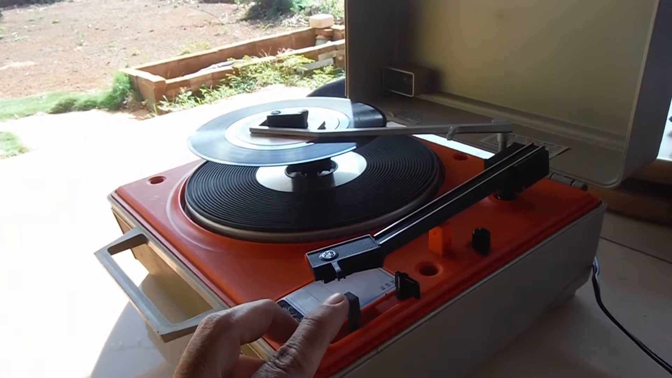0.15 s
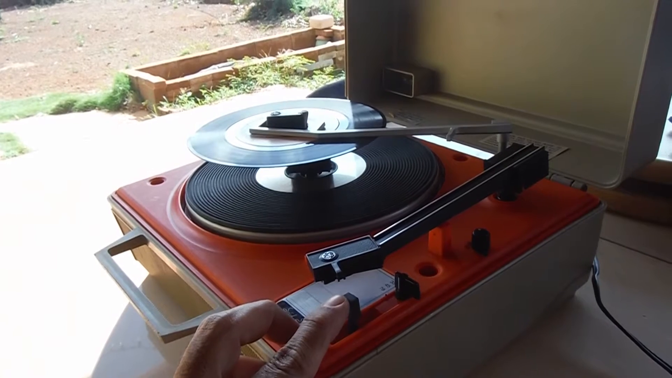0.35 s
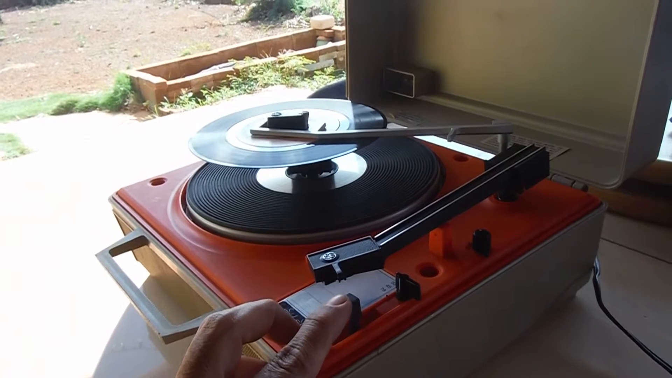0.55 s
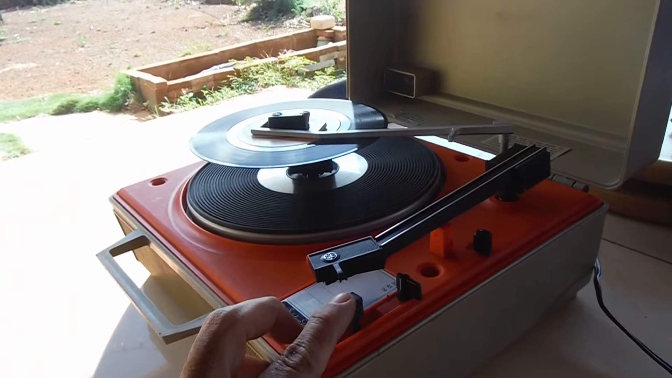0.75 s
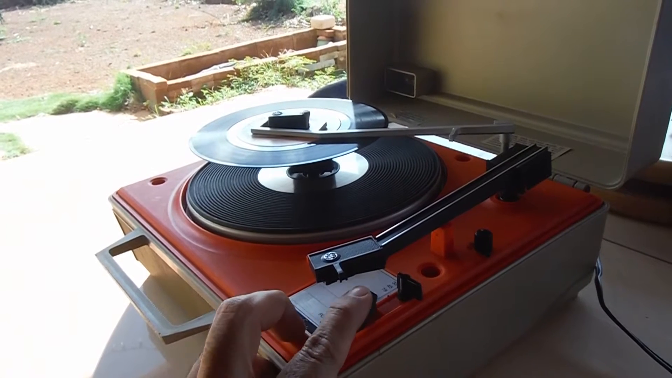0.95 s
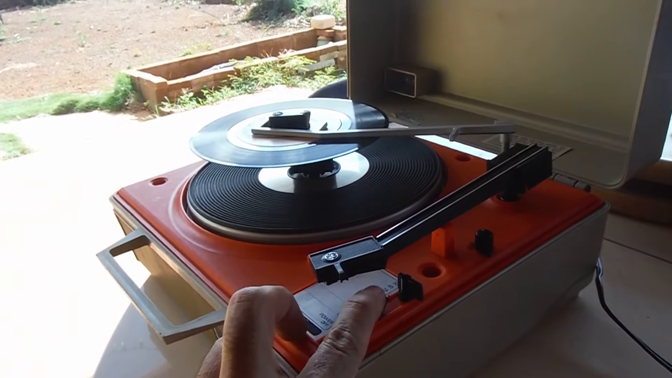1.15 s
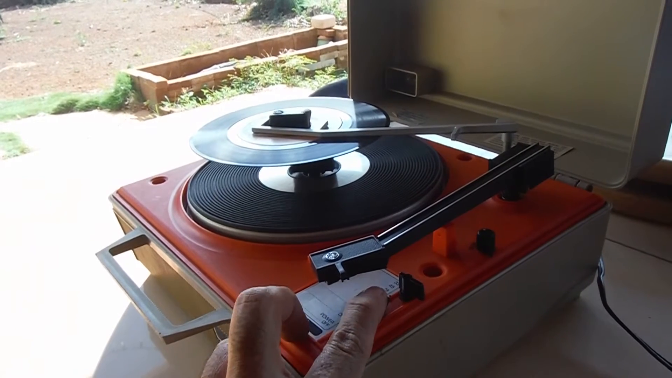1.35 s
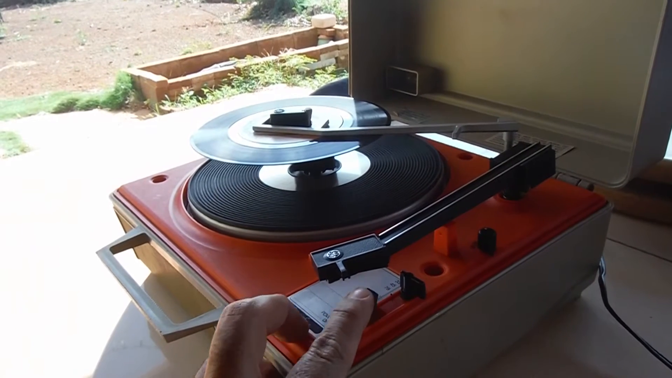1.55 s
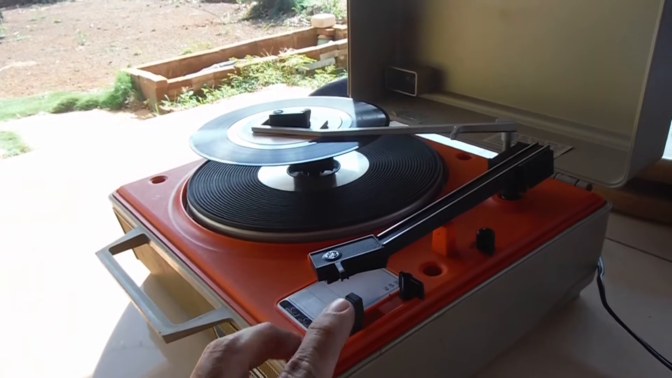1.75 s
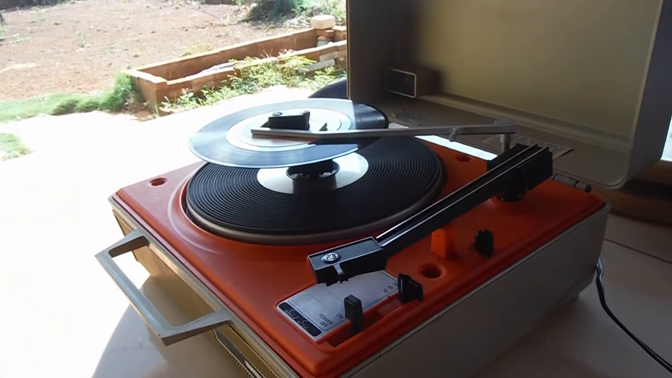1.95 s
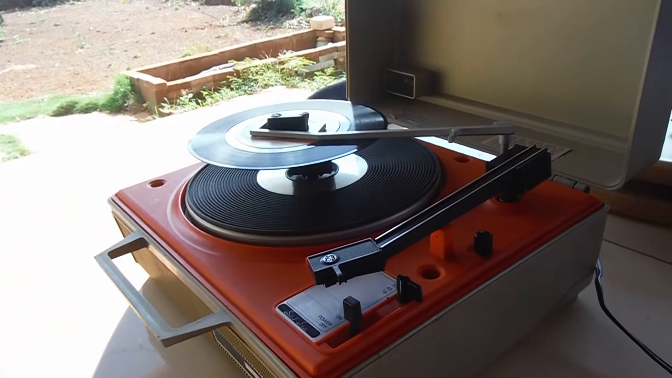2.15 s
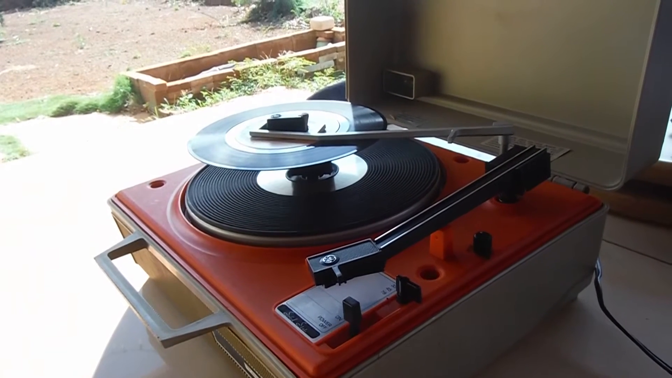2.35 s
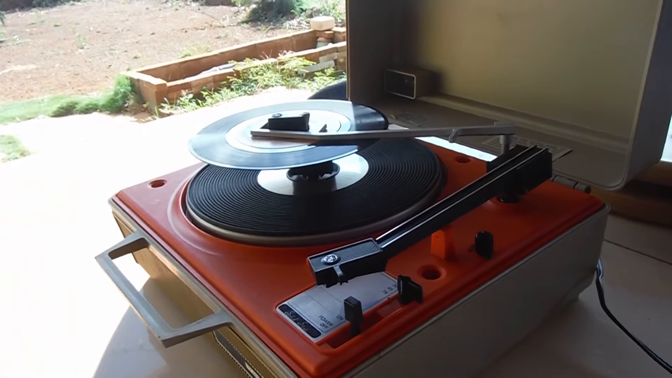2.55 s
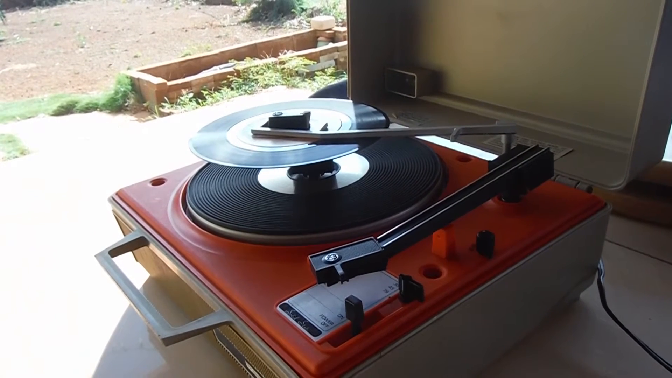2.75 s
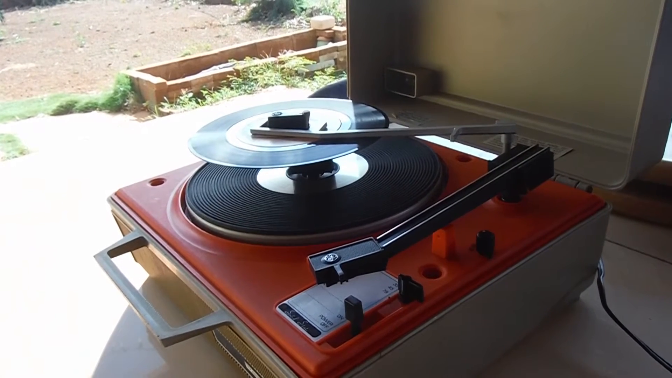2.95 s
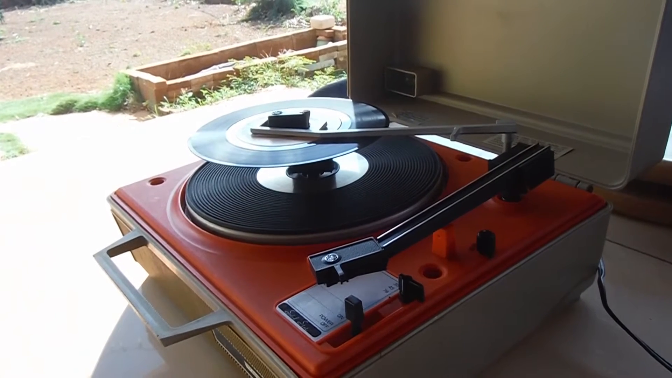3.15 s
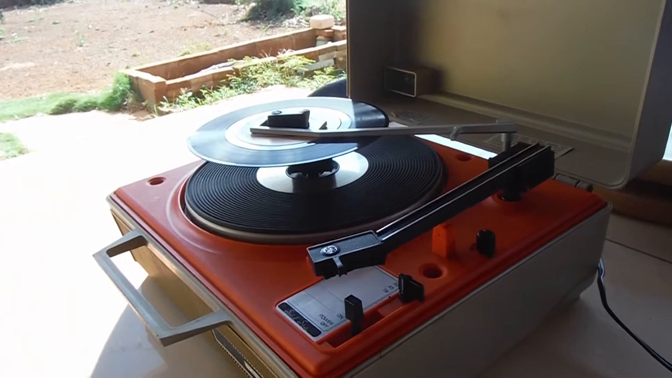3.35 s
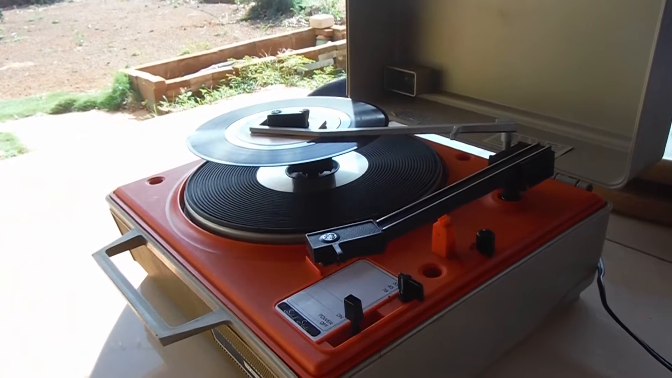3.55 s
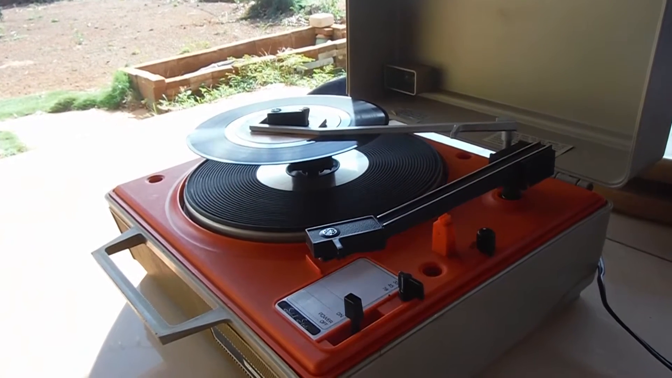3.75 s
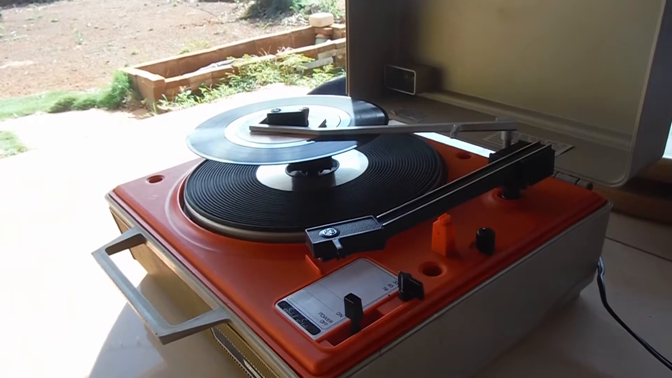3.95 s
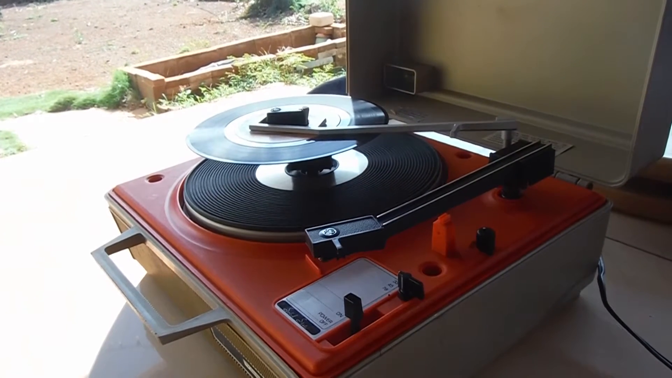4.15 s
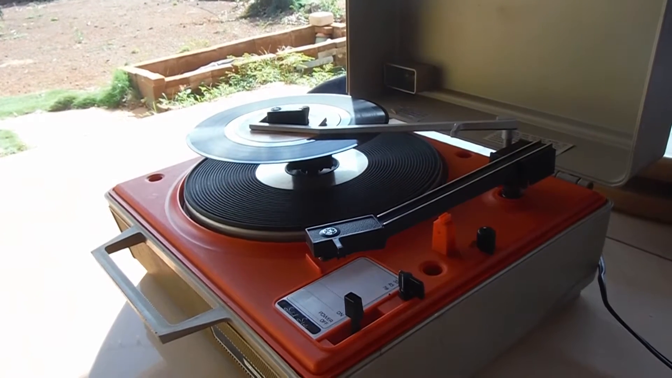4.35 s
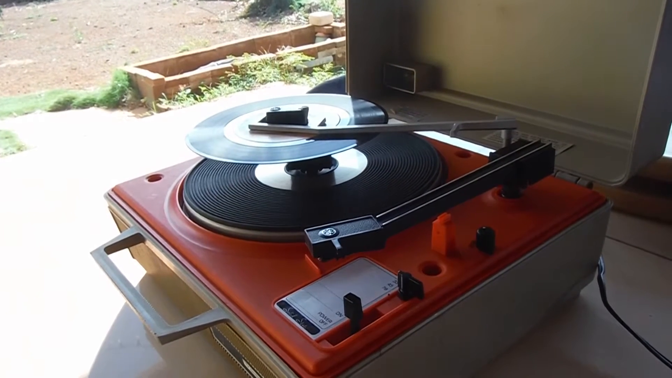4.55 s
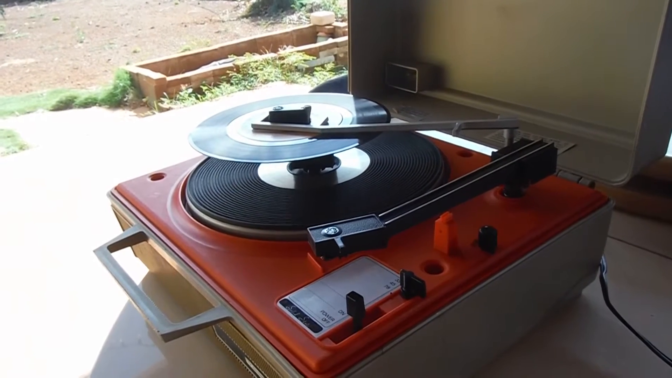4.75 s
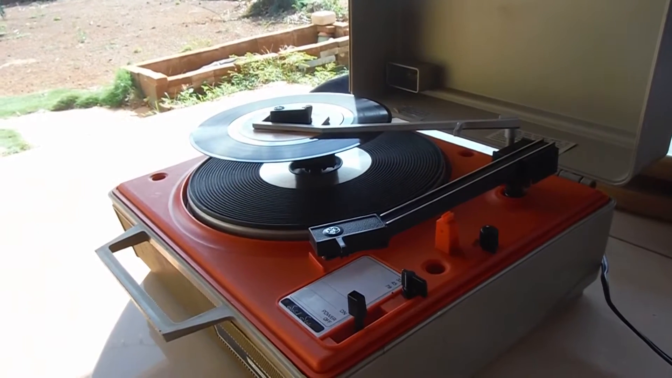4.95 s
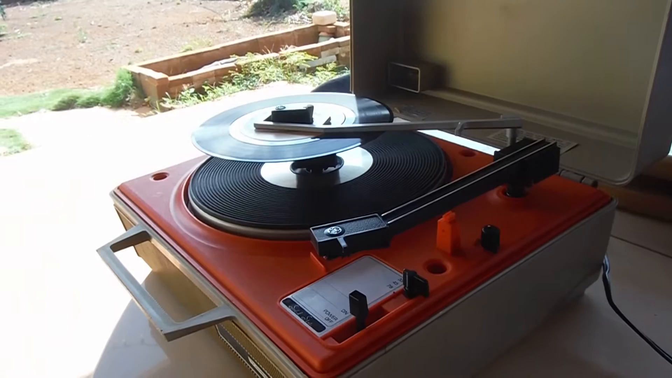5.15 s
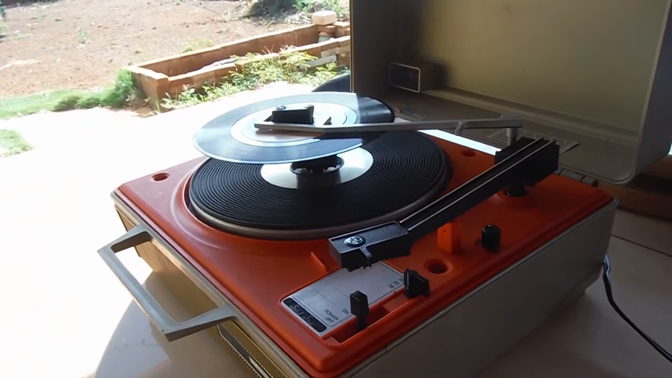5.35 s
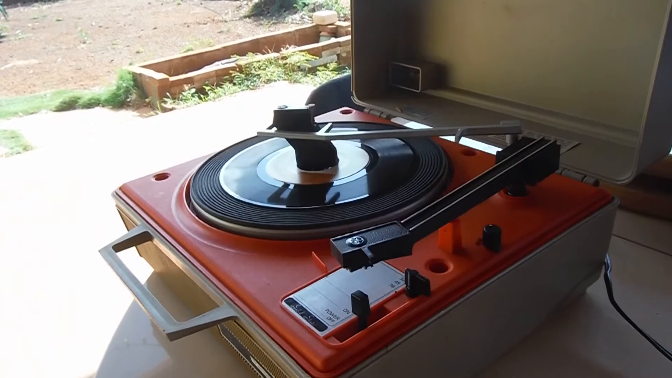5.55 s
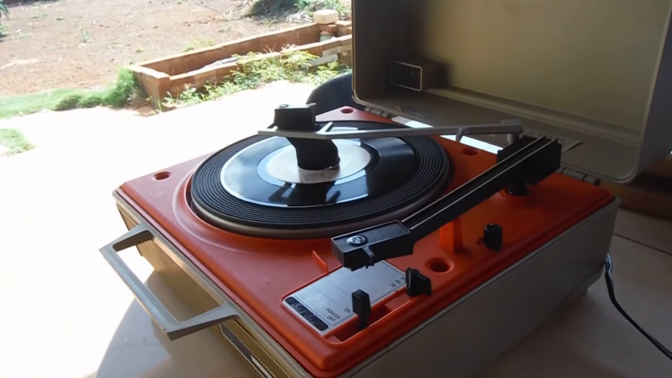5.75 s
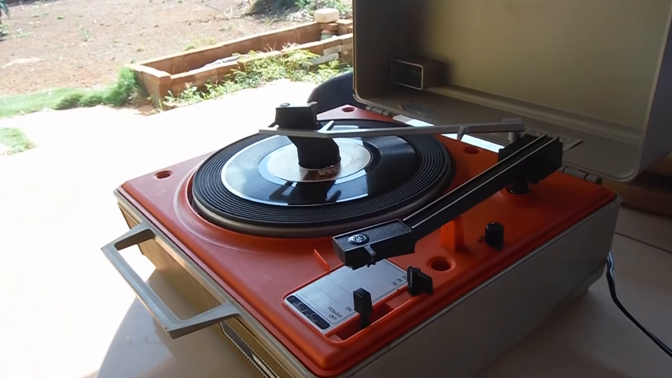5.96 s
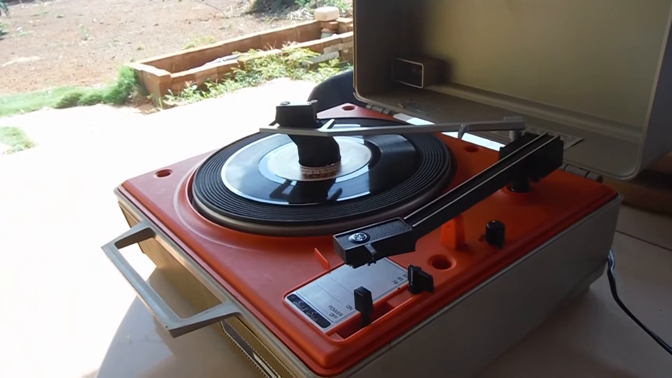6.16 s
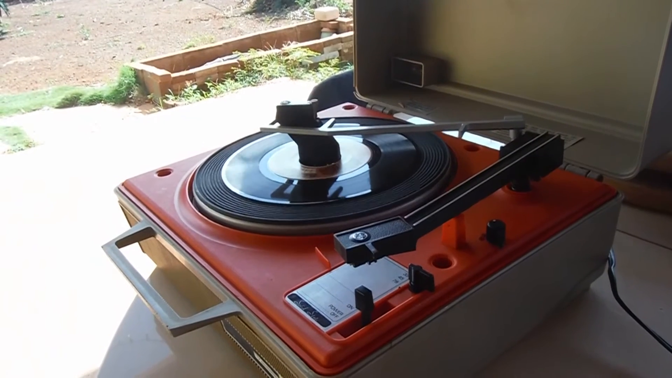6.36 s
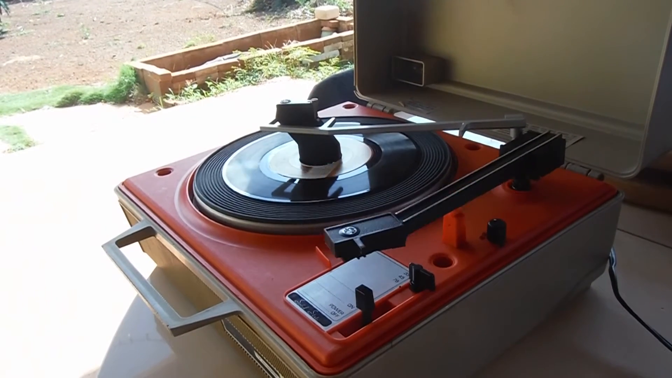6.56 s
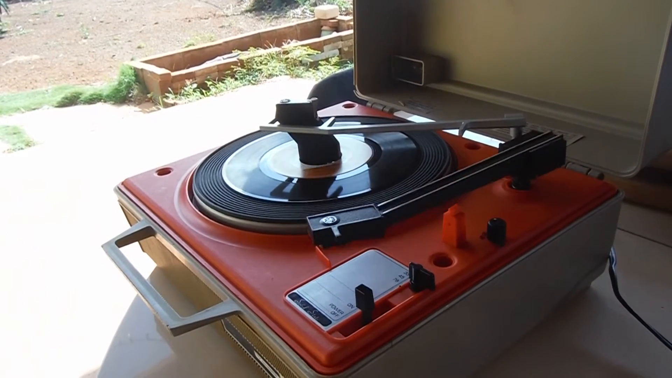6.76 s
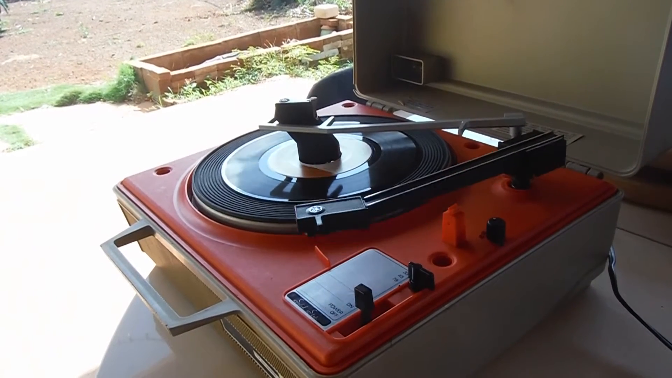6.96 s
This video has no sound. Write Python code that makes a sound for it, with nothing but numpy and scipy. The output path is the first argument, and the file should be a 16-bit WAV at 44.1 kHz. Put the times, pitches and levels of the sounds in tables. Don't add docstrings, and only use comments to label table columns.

```python
import sys
import numpy as np
from scipy import signal
from scipy.fft import rfft, irfft, next_fast_len
from scipy.io import wavfile
from scipy.ndimage import uniform_filter1d, map_coordinates

SR = 44100
rng = np.random.default_rng(int(sys.argv[2]) if len(sys.argv) > 2 else 0)


def volts(x):
    e = np.asarray(x, float) / 20
    return 10 ** e


def store_wav(level_fs):
    pcm = np.round(np.clip(np.atleast_2d(level_fs), -1, 1) * 32767)
    wavfile.write(sys.argv[1], SR, pcm.T.astype(np.int16))


N = 308876

# f/Hz, width/Hz, level/dB
CASE_BODY = [(373.8, 19, -4), (697, 13, -9)]


def unit(x):
    return x / np.sqrt(np.mean(x ** 2) + 1e-20)


def along(points, hz):
    f, v = np.transpose(points)
    return np.interp(np.log(hz + 1), np.log(f + 1), v)


def curves(rows):
    s, *cols = np.transpose(rows)
    return [np.interp(np.arange(N) / SR, s, c) for c in cols]


def wobble(rate):
    at = np.arange(0, N + 16, 16)
    knots = rng.standard_normal(int(N * rate / SR) + 4)
    return np.interp(np.arange(N), at, map_coordinates(knots, [at * rate / SR]))


def filtered(x, response):
    m = next_fast_len(x.shape[-1] + 8192)
    return irfft(rfft(x, m) * response(np.fft.rfftfreq(m, 1 / SR)), m)[..., :x.shape[-1]]


def resonances(body, f):
    return sum(volts(db) * 1j * f * w / (c * c - f * f + 1j * f * w) for c, w, db in body)


def noise(spectrum):
    return unit(filtered(rng.standard_normal(N), lambda hz: volts(along(spectrum, hz))))


def ringing(x, body):
    return filtered(x, lambda f: resonances(body, f) ** 2)


def tone(hz, db, drift_hz, flutter_db):
    phase = 2 * np.pi * np.cumsum(hz + drift_hz * wobble(25)) / SR
    return np.sqrt(2) * volts(db + flutter_db * wobble(7.7)) * np.sin(phase)


def porch(burst, wet_db):
    # f/Hz, t60/s
    porch_t60 = [(300, 0.53), (1000, 0.34), (2500, 0.15), (8000, 0.23), (14000, 0.11)]
    hz, t, z = signal.stft(rng.standard_normal(SR // 3), SR, nperseg=256)
    tail = signal.istft(z * volts(-60 * t / along(porch_t60, hz)[:, None]), SR, nperseg=256)[1]
    tail = tail * (1 - np.exp(-np.arange(len(tail)) / SR / 0.0093))
    tail = tail / np.linalg.norm(tail)
    return volts(wet_db) * signal.fftconvolve(burst[:len(burst) // 3], tail)[:len(burst)]


def even(x):
    z = rfft(x)
    flat = irfft(z / np.sqrt(np.abs(uniform_filter1d(np.abs(z) ** 2, size=60)) + 1e-12), len(x))
    return flat * (np.arange(len(x)) < len(x) // 2)


def contacts(rows, body, knock_db, crack_db, wet_db, steel_hz, low_hz, strike, damping=0.028):
    # low f/Hz, high f/Hz
    ranges = [(200, 1310), (1500, 3780)]
    crack_hz, rise_s, strike_s = 1370, 0.00017, 0.0026
    out, t = np.zeros(N + SR), np.arange(SR // 3) / SR
    damped = [(hz, width + damping * hz, db) for hz, width, db in body]
    bands = [(low_hz, ranges[0][1]), ranges[1], (ranges[-1][1], steel_hz)]
    parts = [signal.butter(2, hz, "band", fs=SR, output="sos") for hz in bands]
    grid = np.fft.rfftfreq(next_fast_len(len(t) + 8192), 1 / SR)
    crack = volts(crack_db) * (1j * grid / (crack_hz + 1j * grid)) ** 2
    colour = resonances(damped, grid) + crack
    for s, db, dull_db, rattle, t60 in rows:
        decay = volts(-60 * np.maximum(t - rattle, 0) / t60)
        shape = (1 - np.exp(-t / rise_s)) * decay * (1 + strike * np.exp(-t / strike_s))
        grain = volts(3 * rng.standard_normal(len(t) // 16 + 1)).repeat(16)[:len(t)]
        grit = rng.standard_normal(len(t)) * grain
        ring = filtered(np.array([even(shape * grit), t == 0]), lambda f: colour)
        burst, spread = np.zeros((2, len(t)))
        for part, level_db in zip(parts, (db + dull_db + knock_db, db + dull_db, db)):
            x, blow = signal.sosfilt(part, ring)
            x = volts(level_db) * x / np.abs(x).max()
            burst += x
            spread += blow * np.linalg.norm(x) / np.linalg.norm(blow)
        out[round((s + rattle / 2) * SR):][:len(t)] += porch(spread, wet_db)
        out[round(s * SR):][:len(t)] += burst
    return out[:N]


def rotor_whine():
    # t/s, level/dB, upper sideband level/dB
    whine_levels = [(0, -71.5, -74), (1.4, -70.5, -79.5), (2.3, -64, -91), (3.3, -67.5, -77),
                    (4.6, -67, -74.5), (6.1, -71, -69.5), (7, -66.5, -85)]
    # offset f/Hz, level/dB
    side_tones = [(-376, -8), (-257, -16.5), (238, -21), (-816, -1.5)]
    hz, (db, upper_db) = 1096, curves(whine_levels)
    whine = tone(hz, db - 0.5, drift_hz=2.5, flutter_db=0.5)
    whine += tone(hz + 120, upper_db - 0.5, drift_hz=1.4, flutter_db=2.0)
    for offset_hz, side_db in side_tones:
        whine += tone(hz + offset_hz, db + side_db, drift_hz=3.3, flutter_db=2.5)
    return whine


def idler_whirr():
    # t/s, level/dB
    idler_levels = [(0, -71.5), (2.05, -70), (2.3, -62.5), (3.2, -56.5), (4.4, -58), (5.8, -68.5), (7, -59)]
    turn_s, dip_s, dip_db, dip_sharp = 1.344, 2.803, 12.5, 2.3
    dips = np.abs(np.cos(2 * np.pi * (np.arange(N) / SR - dip_s) / turn_s)) ** (2 * dip_sharp)
    return tone(335.1, curves(idler_levels)[0] - dip_db * dips, drift_hz=1.4, flutter_db=0.1)


def plinth_rumble(effort_db):
    # f/Hz, level/dB per Hz
    plinth_spectrum = [(88, -41), (150, 1.5), (335, -1.5), (404, -6), (603, -8.5), (719, -8.5), (912, -9),
                       (1090, -8), (1310, -12.5), (3000, -28), (3900, -55.5), (6600, -120)]
    rumble_db = -64.5 + 1.21 * effort_db
    throb = 1 + 0.11 * np.sin(2 * np.pi * 120 * np.arange(N) / SR)
    return volts(rumble_db + 6 + wobble(13)) * throb * noise(plinth_spectrum)


def gear_drone(effort_db):
    drone_db = -68.5 + 2.8 * effort_db + 4.5 * wobble(8.8)
    drone = volts(drone_db + 0.5) * unit(ringing(rng.standard_normal(N), [(107.0, 20, 0)]))
    gear_db = -70 + 4.5 * np.minimum(effort_db, 1)
    return drone + tone(109, gear_db, drift_hz=0.79, flutter_db=7.5)


def wind():
    # t/s, level/dB
    wind_levels = [(0.0, -59.5), (0.29, -61), (0.68, -64.5), (1.13, -57), (1.32, -47), (1.73, -59),
                   (2.63, -44.5), (2.79, -51.5), (3.08, -52), (3.45, -57.5), (4.17, -56.5), (4.87, -60),
                   (5.17, -59), (5.4, -49), (5.91, -43.5), (6.2, -50), (6.53, -43), (7.0, -55)]
    # f/Hz, level/dB per Hz
    breeze = [(12, -29.5), (20, 8), (43, 2), (134, -6), (226, -16), (338, -17.5), (468, -42.5),
              (700, -26.5), (910, -61), (1540, -120)]
    # t/s, peak level/dB, f/Hz
    puffs = [(1.257, -29.5, 110), (1.313, -38, 108), (2.132, -31, 90), (2.386, -32.5, 116),
             (2.421, -34, 52), (2.449, -37, 91), (2.474, -30.5, 50.4), (2.556, -29, 78),
             (2.574, -32.5, 110.4), (2.643, -34.5, 50.7), (2.678, -34, 52.7), (2.8, -32, 68),
             (2.845, -31, 125), (5.262, -27.5, 128), (5.413, -36, 106), (5.568, -34.5, 190),
             (5.67, -38, 75), (5.784, -26, 96), (5.803, -31, 84.8), (5.904, -31, 120), (5.928, -30, 73.4),
             (6.17, -33, 139), (6.432, -18.5, 95.3), (6.464, -38, 105.5), (6.488, -36.5, 76.8),
             (6.522, -30, 82), (6.557, -36.5, 90), (6.577, -37, 53.56), (6.851, -35.5, 66.4),
             (1.322, -40, 45), (1.355, -39, 62), (1.412, -43, 50), (1.450, -43, 85), (1.927, -40, 60),
              (2.270, -41, 70), (2.379, -35, 90), (2.708, -41, 90), (2.732, -37, 50), (3.020, -36, 55),
              (3.053, -36, 50), (3.082, -37, 110), (3.114, -41, 100), (3.220, -43, 60), (3.945, -43, 45),
              (3.974, -44, 110), (4.133, -43, 100), (4.170, -42, 182), (4.292, -41, 90), (5.244, -38.5, 67),
              (5.262, -35, 45), (5.327, -44, 45), (5.539, -37, 130), (5.685, -39, 50), (5.812, -35, 110),
              (5.914, -29, 200), (5.951, -38, 100), (6.040, -39, 70), (6.186, -39, 70), (6.211, -42, 100),
              (6.248, -43, 100), (6.296, -40, 170), (6.340, -41, 110), (6.378, -40, 100), (6.415, -27, 130),
              (6.505, -34.5, 160), (6.731, -43, 45), (6.908, -43, 100), (6.968, -43, 100)]
    # t/s, peak level/dB, f/Hz, count (one each)
    lone = [
        (1.957, -38, 72, 1),
        (6.677, -44.5, 60, 1),
        (6.764, -37.5, 90, 1),
        (6.946, -38, 65.6, 1),
    ]
    rows = puffs + [row[:3] for row in lone]
    s, db, hz = np.transpose(rows)[:, :, None]
    t = np.arange(-1500, 1500) / SR
    turn = rng.normal(0, 0.16, (len(s), 1))
    eddies = -volts(db + 0.5) * np.exp(-(2.64 * hz * t) ** 2) * np.sin(2 * np.pi * hz * t + turn)
    eddies *= 1 + 0.5 * np.exp(-(7 * hz * t) ** 2)
    at = (np.round(s * SR) + np.round(t * SR)).astype(int)
    gusts = np.bincount(at.ravel(), eddies.ravel(), N + SR)[:N]
    lumps = volts(4.9 * np.tanh(wobble(20)))
    return gusts + volts(curves(wind_levels)[0] + 1.0) * unit(lumps * noise(breeze))


def preamp_hiss(effort_db):
    # f/Hz, level/dB per Hz
    hiss_spectrum = [(880, -33.5), (1500, -7), (1920, -5), (3420, -7.5), (5650, -8.5), (9150, -8.5),
                     (11500, -8), (15100, -9), (15700, -8)]
    return volts(-68 + effort_db + 5.5) * noise(hiss_spectrum)


def lens_ticks():
    # t/s, level/dB
    tick_levels = [(0, -76), (1, -80), (2.4, -73.5), (4.2, -75.5), (5.3, -75.5), (7, -74)]
    # f/Hz, width/Hz, level/dB
    lens_body = [(10430, 580, -5.5), (11470, 240, -3.5), (12060, 303, -11)]
    steps = np.zeros(N)
    at = np.arange(0, N - 900, SR // 60)
    draw = rng.standard_normal((len(at), 2))
    late = (200 + 60 * draw[:, 0]).astype(int).clip(0)
    steps[at + late] = volts(3 * draw[:, 1])
    chatter = np.convolve(steps, np.hanning(150))[:N] * rng.standard_normal(N)
    return volts(curves(tick_levels)[0]) * unit(ringing(chatter, lens_body))


def focus_run():
    start_s, end_s, edge_s = 0.094, 0.8, 0.06
    t = np.arange(N) / SR
    return np.clip(np.minimum(t - start_s, end_s - t) / edge_s, 0, 1)


def focus():
    # f/Hz, width/Hz, level/dB
    focus_body = [(11480, 160, 0), (12200, 450, 0), (10060, 600, 0), (13600, 700, 0)]
    focus_db = [-80, -82, -85, -89]
    strain_s, strain_len_s, strain_db = 0.43, 0.043, 12
    swell_db = strain_db * np.exp(-((np.arange(N) / SR - strain_s) / strain_len_s) ** 2)
    out = np.zeros(N)
    for mode, level_db in zip(focus_body, (focus_db[0] + swell_db, *focus_db[1:])):
        pulsing = volts(3.5 * wobble(90.0) + 1.5 * wobble(13.8))
        steps = pulsing * ringing(rng.standard_normal(N), [mode])
        out += volts(level_db + 6.5) * unit(steps)
    return focus_run() * out


def squeal():
    # f/Hz, wander/Hz, level/dB
    squeals = [(12200, 250, -80), (10100, 280, -81)]
    out = np.zeros(N)
    for hz, wander_hz, db in squeals:
        out += volts(5 * wobble(40)) * tone(hz, db, drift_hz=wander_hz, flutter_db=3)
    return focus_run() * out


def camera_scuff():
    beat = (np.arange(N) / SR - 0.865) % 1
    scuff_db = -64.0 - 60 * abs(beat - 0.012) / 0.14
    return volts(scuff_db) * unit(ringing(rng.standard_normal(N), [(7160, 3600, 0)]))


def lever():
    lever_taps = [
        (0.9824, -56, 3, 0.005, 0.055),
        (1.1182, -55, 6.5, 0.0053, 0.032),
        (1.4508, -44.5, 5, 0.0029, 0.078),
        (1.488, -46, -3, 0.002, 0.024),
        (1.6492, -35.5, 4.5, 0.0029, 0.013),
        (1.6548, -39.5, 10.5, 0.0025, 0.025),
    ]
    scrapes = [
        (1.495, -62, 13.5, 0.042, 0.036),
        (1.616, -59.5, 14, 0.026, 0.03),
        (1.664, -57, 10, 0.022, .06),
        (3.939, -52.5, 9.8, 0.022, .02),
        (5.274, -56, 2.9, 0.054, 0.046),
    ]
    lever_body = [(366, 32, 2), (710, 50, 0.5), (1156, 79, 9.5), (1360, 58, 6), (1840, 99, 7),
                  (2450, 120, 0), (3530, 500, -8), (5040, 400, -5), (6840, 500, 1.5), (8120, 600, -3),
                  (10600, 550, -17)]
    return contacts(lever_taps + scrapes, lever_body, knock_db=-2.0, crack_db=-18.0, wet_db=-12.0,
                    steel_hz=10000, low_hz=298.0, strike=0.78)


def power_switch():
    snaps = [
        (1.1688, -44, 0, 0.0013, 0.02),
        (1.172, -49.5, 0, 0.0014, 0.03),
        (1.2081, -33, -6, 0.001, 0.013),
        (1.2119, -36, -10, 0.0005, 0.017),
        (1.2145, -41.5, 2.5, 0.0016, 0.037),
        (1.225, -44, -6, 0.0017, 0.03),
    ]
    switch_body = [(1720, 67, 14), (2460, 76, 9), (3230, 200, -7), (4460, 280, 7), (5600, 250, 0),
                   (6950, 100, -2), (8100, 150, 8), (9300, 200, 4), (10900, 200, -11)]
    return contacts(snaps, switch_body, knock_db=-5.0, crack_db=0, wet_db=-11.0,
                    steel_hz=12000, low_hz=400, strike=2.0)


def links():
    link_s = [1.4512, 1.489, 1.6495, 3.2572, 3.5685, 3.975, 5.2725, 5.28, 5.4715, 5.5295, 5.554, 6.379,
              6.524]
    # bright peak level/dB, dullness/dB, rattle/s, ring t60/s
    link_taps = [(-54, -4, .003, .03), (-55, 6, .004, .02), (-42, -9, 0.0069, 0.037),
                 (-43, -2, .001, 0.012), (-57, 12, 0.0022, .012), (-35, 0, 0.0067, 0.16),
                 (-52, 5, .004, .015), (-57.5, -3.5, .06, .05), (-34.5, 7.5, .006, 0.034),
                 (-18.5, -8.5, .002, 0.013), (-51, 11.5, .04, .08), (-53, -17, .012, .02),
                 (-48, -3, .002, .01)]
    link_body = [(600, 340, -8), (1350, 250, 1), (2700, 400, -2), (3400, 300, 0), (4000, 200, -2.5),
                 (4900, 500, 4.5), (6800, 600, -6), (9000, 1000, -8)]
    return contacts(np.column_stack([link_s, link_taps]), link_body, knock_db=0, crack_db=-12.5, wet_db=-12,
                    steel_hz=11000, low_hz=350, strike=0.3)


def cam_catch():
    catch_taps = [
        (2.2428, -28.5, 1, 0.0016, 0.014),
        (2.2452, -35, 10, 0.00077, 0.029),
    ]
    catch_body = [(490, 100, -7), (730, 18, -1.5), (990, 60, -4), (1750, 120, 7.5), (2590, 120, 3),
                  (3400, 60, 2), (4150, 80, -13), (6600, 250, 0), (7300, 200, 9), (8500, 100, -12),
                  (11200, 400, -6), (14200, 200, -10)]
    return contacts(catch_taps, catch_body, knock_db=-4.5, crack_db=-17, wet_db=-14.0,
                    steel_hz=14500, low_hz=520, strike=0.46, damping=0.025)


def cam():
    cam_taps = [(2.2935, -28, 1, 0.002, 0.038), (2.2965, -34, -3, 0.0035, 0.023),
                (2.3078, -29, -2, 0.00092, 0.026), (2.3092, -31.5, 5, 0.0027, 0.045),
                (2.3133, -26, 0.5, 0.0029, 0.011), (2.322, -42, -1, 0.0048, 0.02),
                (3.2565, -50.5, -1, 0.0015, 0.031), (4.6678, -52, -21, 0.0036, 0.029),
                (5.2714, -41.5, -2, 0.003, 0.01), (5.2925, -56, 3.5, 0.002, 0.015),
                (6.7106, -52, -7.5, 0.0032, 0.024)]
    cam_body = [(360.2, 34, -5.5), (1012, 50, -7), (1830, 110, -3), (2060, 88, 3.5), (2530, 60, -3.5),
                (3057, 60, -6), (3870, 150, -17), (6300, 60, -15.5), (7150, 150, 2.5), (8830, 100, 1),
                (9040, 100, -14), (11800, 97, -7), (12440, 160, -18), (14300, 260, -17)]
    return contacts(cam_taps, cam_body, knock_db=-3.5, crack_db=-10.0, wet_db=-17.5,
                    steel_hz=11700, low_hz=297.7, strike=0.48)


def lift():
    lift_taps = [
        (3.5578, -37, -7, 0.021, 0.029),
        (3.5635, -56, 14, 0.002, 0.025),
        (3.5675, -44.5, 21, 0.00155, 0.029),
        (3.5705, -44.5, 19.5, 0.0019, 0.021),
    ]
    lift_body = [(412, 50, -5), (667, 46, -1.5), (907, 80, -1), (1820, 47, 3), (2160, 170, 12.5),
                 (2630, 200, 10.5), (3200, 170, -15), (3470, 130, -4), (4150, 84, -6.5), (5300, 200, -9),
                 (6900, 740, 0.5), (9400, 600, -4), (12600, 10, 2)]
    return contacts(lift_taps, CASE_BODY + lift_body, knock_db=2.5, crack_db=-16.0, wet_db=-13.5,
                    steel_hz=13000, low_hz=313, strike=0.1, damping=0.015)


def trip_pawl():
    pawl_taps = [
        (3.9578, -18.5, -1.5, 0.0011, 0.014),
        (3.9589, -9, -1, 0.0013, 0.014),
        (3.9609, -5.5, -5.5, 0.00026, 0.0072),
        (3.9627, -7.5, -1.5, 0.00099, 0.01),
        (3.9648, -8, -4, 0.0013, 0.0057),
        (3.967, -17, -2.5, 0.0028, 0.063),
    ]
    pawl_case = [(340, 45, -2.5), (724, 23, -1)]
    pawl_body = [(634, 62, -1.5), (900, 63, -8), (1163, 23, 7.5), (1460, 40, 7.5), (1875, 55, 5),
                 (2070, 110, 3), (3300, 110, -14), (4170, 91, 2), (4600, 120, 8), (7000, 60, -4),
                 (7900, 80, 2.5), (8750, 71, 5.5), (11000, 200, -14), (11500, 200, -6)]
    return contacts(pawl_taps, pawl_case + pawl_body, knock_db=-6.5, crack_db=-4.0, wet_db=-19.0,
                    steel_hz=15100, low_hz=318, strike=0.059)


def spindle_slip():
    slip_taps = [
        (5.4455, -32.5, 2.5, 0.00078, 0.02),
        (5.449, -41.5, 6, 0.0033, 0.03),
        (5.4577, -18, -3.5, 0.00049, 0.01),
        (5.462, -33, 1.5, 0.0042, 0.03),
    ]
    slip_body = [(417, 68, 3), (880, 80, 3.5), (1690, 100, 4.5), (2400, 150, 0), (3520, 270, -12.5),
                 (5840, 120, 8.5), (7000, 100, -4.5), (7600, 200, 1), (8800, 60, 4.5), (9270, 100, -2.5),
                 (10100, 104, -5), (10950, 200, -7), (13300, 400, -12.5)]
    return contacts(slip_taps, slip_body, knock_db=-5.5, crack_db=-10.5, wet_db=-10.0,
                    steel_hz=13000, low_hz=250, strike=0.3, damping=0.042)


def disc():
    disc_taps = [
        (5.4695, -15.5, -11.5, 0.0039, .02),
        (5.4743, -9, -5.5, 0.0012, 0.012),
        (5.4778, -10.5, -4, 0.0012, 0.021),
        (5.481, -19, -6.5, 0.0014, 0.015),
        (5.4845, -19.5, -1, 0.0031, 0.043),
    ]
    disc_body = [(243.8, 46.5, -1.5), (923, 40, 1), (1200, 160, -0.5), (1680, 100, -1), (2070, 81, -5.5),
                 (2867, 170, -15), (5530, 200, -7), (6500, 400, -7.5), (7800, 220, 0.5), (8880, 100, 4.5),
                 (9230, 100, -2.5), (10500, 200, -11.5), (12200, 400, -12.5), (14130, 300, -10.5)]
    return contacts(disc_taps, CASE_BODY + disc_body, knock_db=0.5, crack_db=-16.5, wet_db=-14.0,
                    steel_hz=14750, low_hz=193, strike=0.065, damping=0.02)


def holding_arm():
    arm_taps = [
        (5.5195, 4, -5.5, 0.0013, 0.0063),
        (5.5213, -2.5, -2, .0008, 0.009),
        (5.5232, -7, -4, 0.00084, 0.0088),
        (5.5265, -12.5, 1.5, 0.0051, 0.022),
        (5.5471, -11.5, -8, 0.00014, 0.006),
        (5.558, -29, -6.5, 0.0025, 0.057),
        (5.639, -39.5, -6, 0.0023, 0.044),
    ]
    arm_body = [(1000, 60, -5.5), (1310, 230, 0), (2014, 87, -3.5), (2386, 120, 2), (3096, 200, -3),
                (4454, 120, 12), (5000, 65, 3.5), (5500, 140, -6.5), (7160, 50, 3.5), (7900, 100, 5),
                (8654, 60, 3.5), (10390, 210, -3.5), (11260, 150, -6), (13200, 100, -6.5)]
    return contacts(arm_taps, CASE_BODY + arm_body, knock_db=-15.5, crack_db=-5.5, wet_db=-15.5,
                    steel_hz=12500, low_hz=199.0, strike=0.74)


def trip_lever():
    trip_taps = [
        (6.328, -44.5, 12, 0.003, 0.026),
        (6.3345, -52.5, 14.6, 0.00096, 0.018),
        (6.5034, -55.5, 12, 0.0022, 0.025),
        (6.5234, -57, 3, 0.0021, 0.033),
    ]
    trip_body = [(760, 16, 1), (1010, 69, 1.5), (1300, 78, -3.5), (1795, 150, 15.5), (2460, 150, 0.5),
                 (3000, 60, -22), (3340, 46, -6), (4070, 100, -16), (6600, 100, -6), (7150, 110, 12),
                 (8800, 100, -28), (10000, 150, -41)]
    return contacts(trip_taps, trip_body, knock_db=-0.5, crack_db=-6.5, wet_db=-15.0,
                    steel_hz=12000, low_hz=530, strike=0.46)


def scene():
    # t/s, level/dB
    load = [(0.0, -70), (0.92, -70.5), (1.19, -70), (1.3, -66), (1.65, -65.5), (2.01, -66.5), (3.96, -66),
            (4.21, -68), (5.26, -68.5), (5.46, -64), (5.91, -68), (7.0, -66)]
    load_db = curves(load)[0]
    effort_db = load_db - load_db.mean()
    motor = rotor_whine() + idler_whirr() + plinth_rumble(effort_db) + gear_drone(effort_db)
    camera = preamp_hiss(effort_db) + lens_ticks() + focus() + squeal() + camera_scuff()
    starting = lever() + power_switch() + links() + cam_catch() + cam()
    cycle = lift() + trip_pawl() + spindle_slip() + disc() + holding_arm() + trip_lever()
    return (motor + wind() + camera + starting + cycle)[None]


def roll_off(x):
    return signal.sosfilt(signal.butter(12, 16860, fs=SR, output="sos"), x)


def record(dry):
    top_hz = 15750
    soft = dry / (1 + np.abs(dry / 0.9) ** 6) ** (1 / 6)

    def microphone(hz):
        band_limit = np.clip((top_hz + 150 - hz) / 300, 0.003, 1)
        return band_limit / np.sqrt(1 + (hz / 16000) ** 4)

    return roll_off(filtered(soft, microphone))


dry = scene()
out = record(dry)
store_wav(out)
```